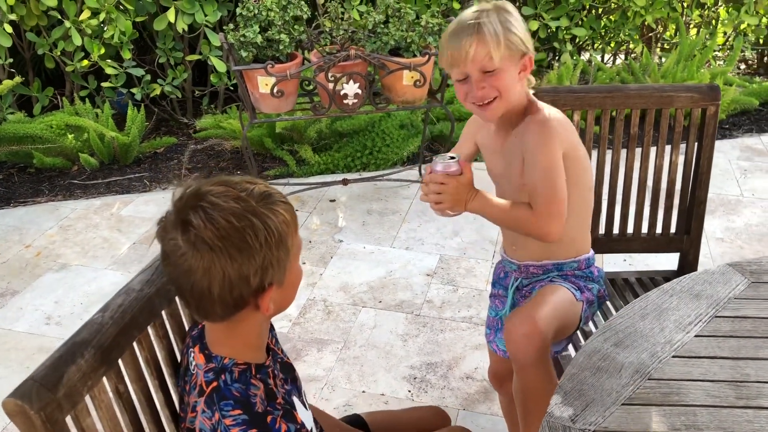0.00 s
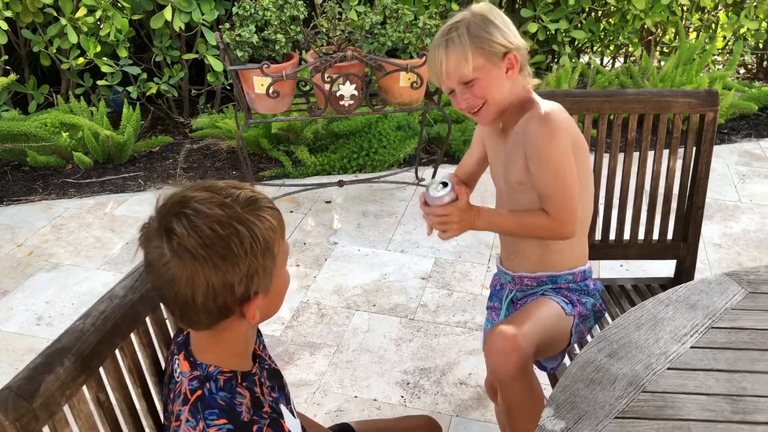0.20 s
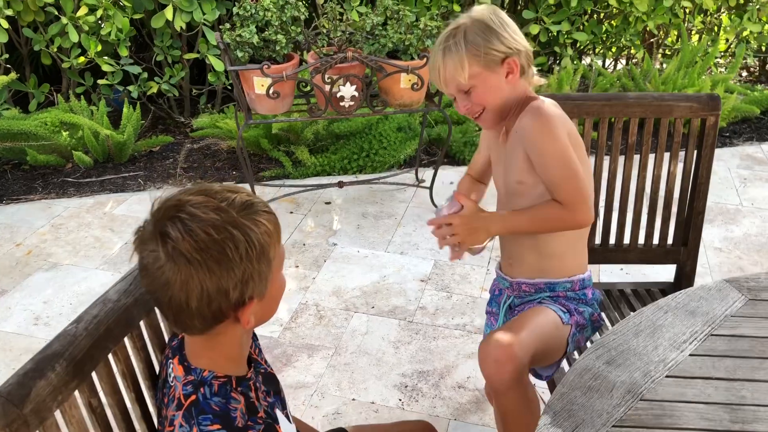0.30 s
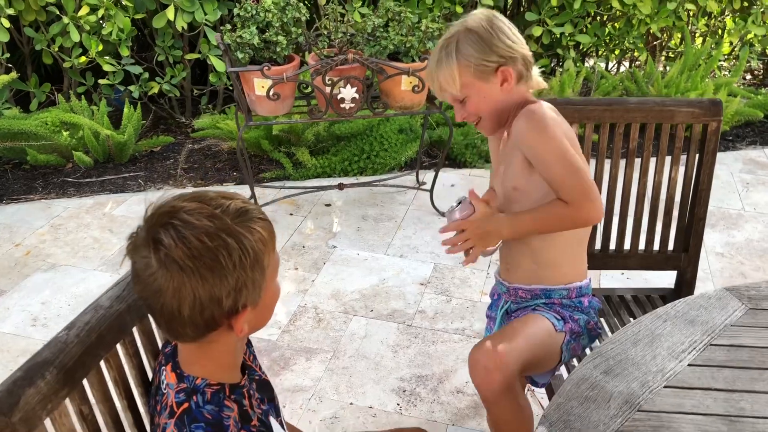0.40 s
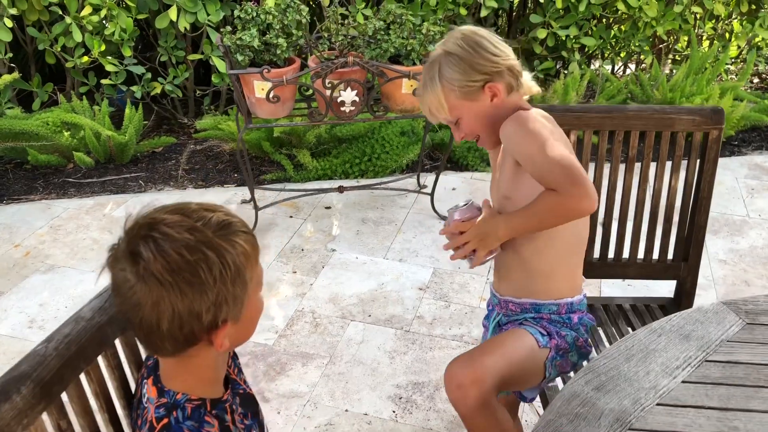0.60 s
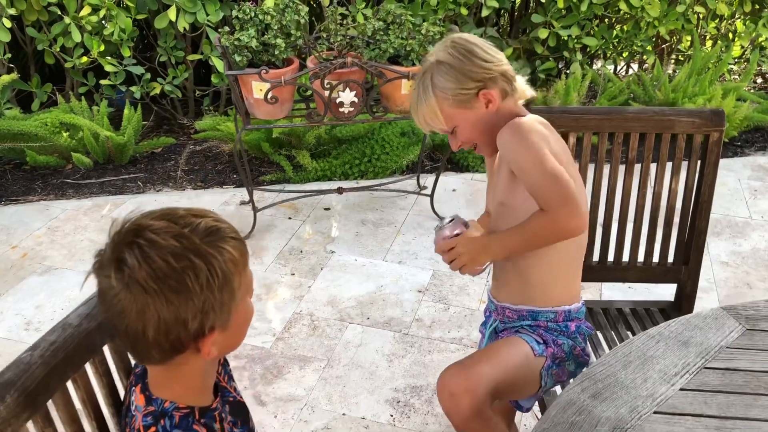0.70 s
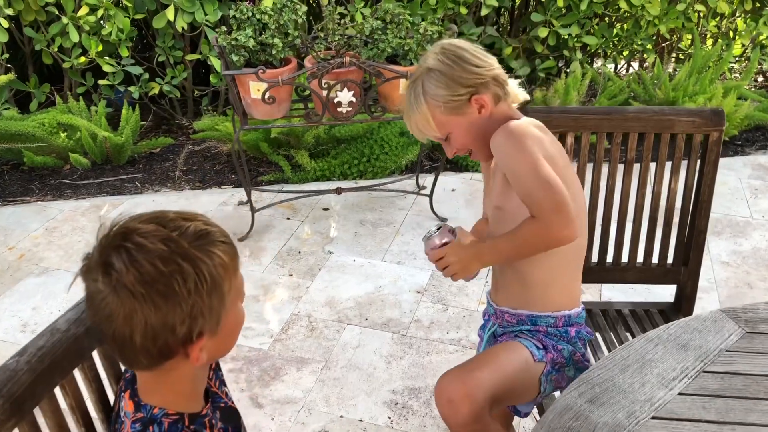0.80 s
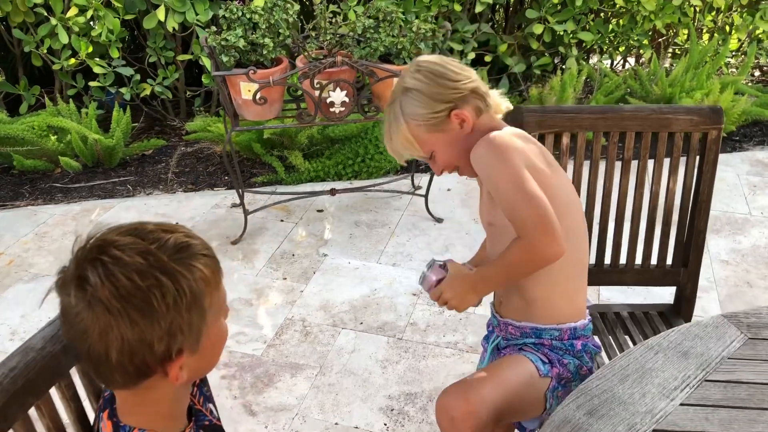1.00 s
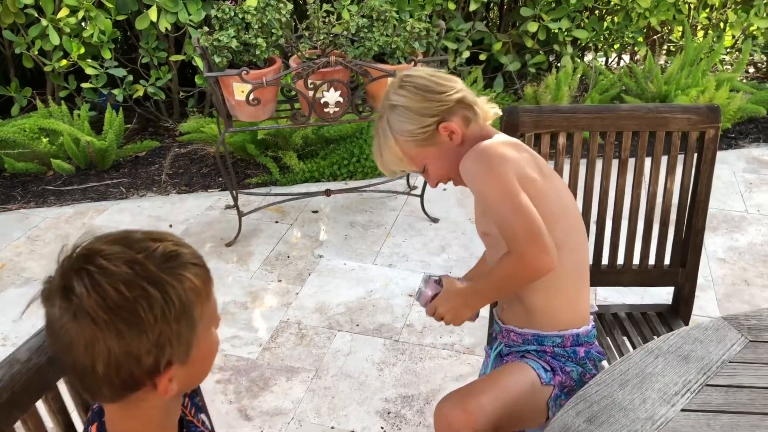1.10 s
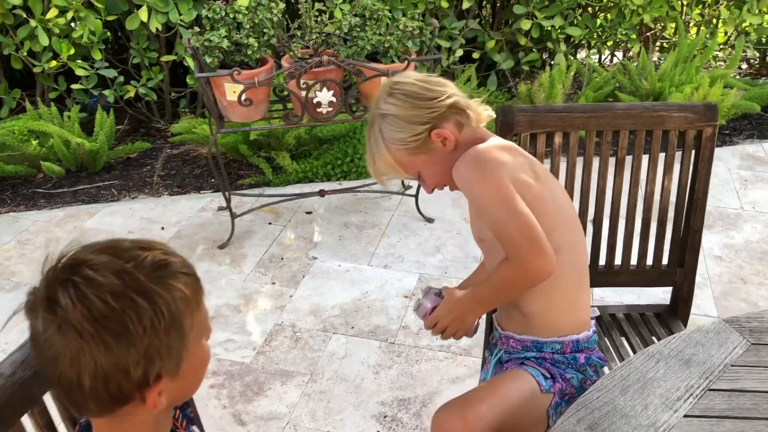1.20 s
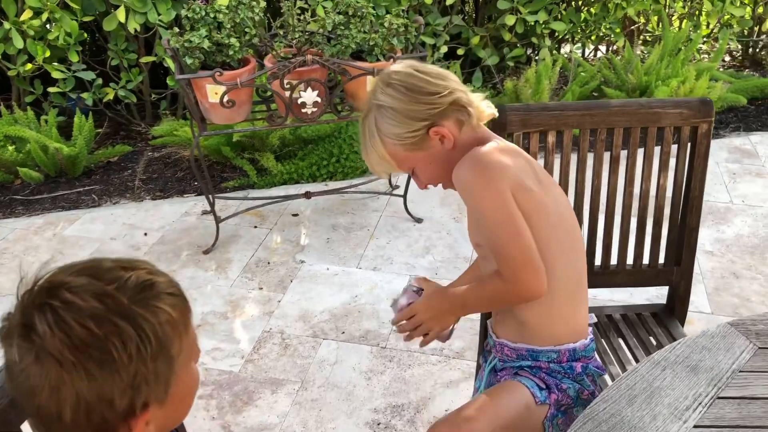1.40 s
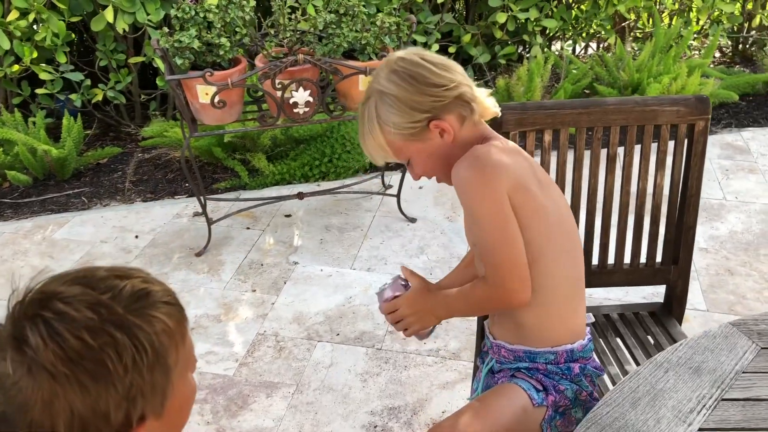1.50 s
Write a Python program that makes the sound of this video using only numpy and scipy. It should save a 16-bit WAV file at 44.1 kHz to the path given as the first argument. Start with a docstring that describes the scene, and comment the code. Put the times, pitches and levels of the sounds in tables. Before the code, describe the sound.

Hands crumple an empty metal drink can outdoors, with crisp, tinny pops and hollow crunches

```python
"""Patio: a thin aluminium drink can is crushed by hand.
Each buckle is a sharp crack that runs through the wall, rings the folded facet and its crease and thumps
the hollow can; these are filters driven by a click and a noise swarm. Dull knocks follow as the grip shifts.
Noise tails give the patio's reflections; behind lie filtered-noise garden air, faint wavering hum tones
and a few low sine bumps."""
import sys
import numpy as np
from scipy import signal
from scipy.fft import rfft, irfft
from scipy.io import wavfile
from scipy.ndimage import uniform_filter1d

SR = 44100
rng = np.random.default_rng(int(sys.argv[2]) if len(sys.argv) > 2 else 0)


def wav_record(signal):
    """Record a signal, one row per channel, as 16-bit PCM in the file named by sys.argv[1]."""
    frames = np.transpose(np.atleast_2d(signal))
    bounded = np.clip(frames, -1, 1)
    # unit amplitude maps onto the largest positive 16-bit level
    quanta = np.round(bounded * 32767).astype(np.int16)
    wavfile.write(sys.argv[1], SR, quanta)


N = 70560
LEAD_S = 0.1  # room ahead of time zero for the earliest buckle
BLOCK = 8192  # samples per short sound
FREQS = np.fft.rfftfreq(BLOCK, 1 / SR) + 1e-6  # Hz, kept off zero
TIME = np.arange(N) / SR


def amp(db):
    """Decibels to gain."""
    return 10 ** (np.asarray(db) / 20)


def colour(points, freqs=FREQS):
    """Gain per frequency, interpolated in dB over log frequency from (Hz, dB) points."""
    hz, db = np.array(points).T
    return amp(np.interp(np.log(np.maximum(freqs, 1)), np.log(hz), db))


def tint(x, points):
    """Filter a sound by (Hz, dB) points."""
    gain = colour(points, np.fft.rfftfreq(len(x), 1 / SR))
    return irfft(rfft(x) * gain)


def resonance(hz, width_hz):
    """Response of one damped resonance, gain 1 at its centre."""
    damping = 1j * FREQS * width_hz
    return damping / (hz ** 2 - FREQS ** 2 + damping)


def lowpass(hz):
    """Response of a fourth-order low-pass."""
    s = 1j * FREQS / hz
    return 1 / (s * s + np.sqrt(2) * s + 1) / (s * s + s + 1)


def delay(seconds):
    """Phase response of a delay; seconds may vary with frequency."""
    return np.exp(-2j * np.pi * FREQS * seconds)


def swarm(t60_s, rise_s, count):
    """Dense reflections: noise that swells and decays exponentially, unit energy."""
    t = TIME[:count]
    envelope = (1 - np.exp(-t / rise_s)) * np.exp(-np.log(1000) * t / t60_s)
    x = rng.standard_normal(count) * envelope
    return x / np.linalg.norm(x)


def scatter(t60_s, rise_s):
    """Spectrum of a short swarm, its power evened out to gain near 1."""
    spectrum = rfft(swarm(t60_s, rise_s, count=BLOCK))
    return spectrum / np.sqrt(uniform_filter1d(abs(spectrum) ** 2, size=140))


def add(track, at_s, spectrum):
    """Lay a short sound into the track, with a margin for energy ahead of its onset."""
    margin_s = 0.008
    start = max(int((at_s + LEAD_S - margin_s) * SR), 0)
    track[start:start + BLOCK] += irfft(spectrum * delay(margin_s))


def can():
    """Snaps scatter round the wall, treble first as bending waves, and drive crack, facet, crease and hollow."""
    # Buckles. Each row: start in seconds, crack level in dB, crack cut-off in Hz, facet in Hz,
    # facet filter width in Hz, facet level in dB, crease in Hz, crease level in dB, hollow level in dB,
    # snap T60 in seconds.
    buckles = [ (-.015, 6, 13000, 4680, 300, 8, 6600, -2, -8, 0.01),
               (.008, -13, 13000, 4850, 400, -1, 8100, -16, 4, 0.046),
               (.2127, 12, 15200, 2650, 756, 18, 7300, 21, 12.5, 0.017),
               (0.2442, -4, 9000, 3900, 1800, 3.5, 4500, -3.5, -2.5, 0.028),
               (0.3772, -22, 4450, 1380, 400, 3.5, 3240, -6, -16, 0.017),
               (0.3885, 3, 12000, 1206, 180, 22, 5260, 8, 0.5, .026),
               (0.4576, -26, 4240, 2020, 525, 11.5, 3800, -3, -9, 0.025),
               (0.5186, 4.5, 5560, 3260, 476, 14, 8060, 10.5, -8, 0.026),
               (0.5393, 2, 14500, 4150, 600, 6, 10500, 11.5, 5, 0.018),
               (0.5527, 2, 12200, 1155, 1100, 17.5, 2200, 2.5, 22.5, 0.0088),
               (0.5692, 7.5, 12000, 1480, 600, 20.5, 7340, 16, 7.5, 0.013),
               (0.6003, 3.5, 9000, 1630, 700, 6, 3870, 12, -1, 0.02),
               (0.6113, -1, 11100, 1670, 600, 9, 3350, 9, -7, 0.012),
               (0.6136, -11, 12000, 1920, 900, 2, 5600, 10.5, -7, 0.015),
               (.6340, 3, 14000, 1250, 650, 15, 8190, 10.5, -12.5, 0.012),
               (.6918, 11, 11500, 2040, 1020, 19, 8360, 15.5, 17, 0.014),
               (0.7031, -8, 11100, 1045, 250, 19.5, 2230, 4.5, 2.5, 0.057),
               (0.7101, -0.5, 10000, 1390, 1100, 14.5, 4490, 10.5, 10, .035),
               (0.7195, -3, 9000, 1600, 1100, 6.5, 2220, 4.5, 16, .045),
               (0.7317, -1, 10400, 1830, 1200, -3, 4200, -9, 9, 0.067),
               (0.8513, -5.5, 12900, 2010, 400, 3, 7150, 3.5, -1.5, 0.024),
               (0.9085, -11, 6100, 1480, 900, 7, 4200, -10, -8, 0.015),
               (0.911, 10, 13800, 1160, 452, 26, 2220, 10, 11, .025),
               (.9265, 6, 14460, 1000, 610, 18.5, 6080, 13, 20.5, 0.022),
               (0.927, 6, 13500, 980, 480, 24, 9620, 14.5, 6, 0.037),
               (0.9424, -4, 11000, 1140, 258, 6, 8570, -5, 10, 0.059),
               (.989, -22, 6040, 900, 450, -22, 1960, 0, -18, .08),
               (1.005, -29, 6000, 1050, 450, -0.5, 1900, -6, -23, 0.067),
               (1.0221, -28, 6000, 3880, 1300, 0.5, 4810, 4, -22, 0.011), ]
    # Colour of a crack. Each row: frequency in Hz, gain in dB.
    crack_colour = [(220, -11), (420, 0), (720, -3.5), (1150, 3.5), (2250, -0.3), (3050, -2.1),
                    (4600, -1.56), (6100, -0.75), (8100, -0.1), (10600, 0.8), (12600, -3.3), (15800, 0)]
    # Lasting modes of the can's wall. Each row: frequency in Hz, level in dB, T60 in seconds.
    wall_modes = [(927, 2.5, 0.44), (1101, -0.5, .23), (1237, -4.5, 0.058), (1276, -17.5, .19),
                  (1434, -20, .14), (1604, -10.5, .15), (1642, -5.5, 0.077), (1901, -5, .19),
                  (2088, -9.5, .19), (2228, -2.5, 0.1), (2340, 1.5, 0.04), (4680, -3, .21)]
    hollow_hz, hollow_width_hz = 480, 170
    first_click_db, snap_rise_s, lag_at_1khz_s = -5, 0.00032, 0.00072
    crease_width_share, wall_retune_share = 0.13, 0.012

    out = np.zeros(2 * N)
    crack = colour(crack_colour)
    click = amp(first_click_db)
    hollow = 1
    for widening in (1, 3, 4):
        hollow = hollow * resonance(hollow_hz, widening * hollow_width_hz)
    wall = sum(amp(db) * resonance(hz, np.log(1000) / np.pi / t60_s) for hz, db, t60_s in wall_modes)
    # group delay falls as 1 / sqrt(frequency); the phase delay is twice that
    bending = delay(2 * lag_at_1khz_s * np.sqrt(1000 / FREQS))
    for (at_s, crack_db, cut_hz, facet_hz, width_hz, facet_db,
         crease_hz, crease_db, hollow_db, t60_s) in buckles:
        sharp, deep = [(click + scatter(t60_s, snap_rise_s)) / np.hypot(1, click) for _ in range(2)]
        facet = resonance(facet_hz, width_hz) * resonance(facet_hz, 4 * width_hz)
        crease = resonance(crease_hz, crease_width_share * crease_hz) ** 2
        body = amp(facet_db) * facet + amp(crease_db) * crease + amp(hollow_db) * hollow
        # every dent retunes the wall a little
        retune = 1 + wall_retune_share * rng.standard_normal()
        ring = np.interp(FREQS * retune, FREQS, wall)
        snap = sharp * amp(crack_db) * crack * lowpass(cut_hz) + deep * body
        add(out, at_s, snap * (1 + ring) * bending)
    return out


def patio(x):
    """Direct sound plus near reflections and a fainter, longer tail, each a tinted noise swarm."""
    # Near reflections, then far tail. Each row: frequency in Hz, gain in dB.
    near_colour = [(210, 8.5), (620, -7), (1550, -7.5), (4100, 0), (8100, -0.5), (15800, -1)]
    far_colour = [(210, 2.5), (460, 3), (1050, 2), (2100, -2.5), (4100, 0.5), (8100, -4), (15800, -9)]

    def tail(db, t60_s, rise_s, delay_s, points):
        """Impulse response of one delayed, tinted swarm; db is its level ahead of the tint."""
        late = np.roll(swarm(t60_s, rise_s, count=32768), int(delay_s * SR))
        return amp(db) * tint(late, points)

    near = tail(db=-9.5, t60_s=0.11, rise_s=0.001, delay_s=0.0045, points=near_colour)
    far = tail(db=-19, t60_s=0.52, rise_s=0.012, delay_s=0.026, points=far_colour)
    return x + signal.fftconvolve(x, near + far)[:len(x)]


def walk(rate_hz):
    """Slow random wander: smoothed steps."""
    step = int(SR / rate_hz)
    steps = np.repeat(rng.standard_normal(N // step + 1), step)
    return uniform_filter1d(steps, step)[:N]


def garden():
    """Steady outdoor air as tinted noise, with sine hum tones that wander in pitch."""
    # Air spectrum. Each row: frequency in Hz, relative density in dB.
    air_colour = [(12, -57), (20, -14.5), (61, -2.5), (107, -1.5), (210, -11), (262, -13), (513, -17.5),
                  (574, -13), (873, -19), (1060, -17.5), (1440, -24), (1570, -23.5), (3250, -35),
                  (5380, -37), (16000, -51.5)]
    # Hum tones. Each row: frequency in Hz, RMS level in dB.
    hum_tones = [(119.5, -57.5), (500.6, -66), (941, -87), (1060, -64.5)]
    air_rms_db, hum_wander_hz = -46.5, 1.5

    air = tint(rng.standard_normal(N), air_colour)
    hum = 0
    for hz, db in hum_tones:
        cycles = rng.random() + np.cumsum(hz + hum_wander_hz * walk(rate_hz=14)) / SR
        hum = hum + amp(db) * np.sqrt(2) * np.sin(2 * np.pi * cycles)
    return air / air.std() * amp(air_rms_db) + hum


def bumps():
    """Low thuds: sines that swell and die quickly."""
    # Each row: start in seconds, frequency in Hz, envelope peak in dB, time to peak in seconds.
    bump_rows = [(0.204, 120, -33.5, 0.0073), (.238, 71.4, -29, 0.0053), (0.476, 101, -35, 0.0067),
                 (0.495, 68, -36.5, 0.019), (1.168, 72.8, -38.5, 0.013), (1.248, 166.4, -29, 0.0026),
                 (1.25, 85, -37.5, .011)]
    out = 0
    for at_s, hz, db, peak_s in bump_rows:
        age = np.maximum(TIME - at_s, 0)
        envelope = age / peak_s * np.exp(1 - age / peak_s)
        out = out + amp(db) * envelope * np.sin(2 * np.pi * hz * age)
    return out


def knocks():
    """Dull little knocks as the grip shifts: a short swarm through a resonance, plus the same swarm low-passed."""
    # Each row: start in seconds, frequency in Hz, level in dB, level of the low-passed swarm in dB, its cut-off
    # in Hz.
    knock_rows = [(1.402, 422, 10, -27.5, 9000), (1.4601, 603, -4.5, -13.5, 1900)]
    out = np.zeros(2 * N)
    for at_s, hz, db, click_db, cut_hz in knock_rows:
        thud = amp(db) * resonance(hz, width_hz=193) ** 2
        click = amp(click_db) * lowpass(cut_hz)
        add(out, at_s, scatter(t60_s=0.018, rise_s=0.0017) * (thud + click))
    return out


def scene():
    """Can and knocks with the patio's answer, over bumps and garden."""
    lead = int(LEAD_S * SR)
    handled = (can() + knocks())[:lead + N]
    return (patio(handled)[lead:] + bumps() + garden())[None]


def record(dry):
    """The recorder drops the deepest rumble, clips the highest peaks and cuts the top."""
    rumble_cut = signal.butter(3, 32, "high", fs=SR, output="sos")
    top_cut = signal.ellip(10, 0.2, 80, 15750, fs=SR, output="sos")
    thinned = signal.sosfilt(rumble_cut, dry)
    return signal.sosfilt(top_cut, np.clip(thinned, -1, 1))


dry = scene()
out = record(dry)
wav_record(out)
```